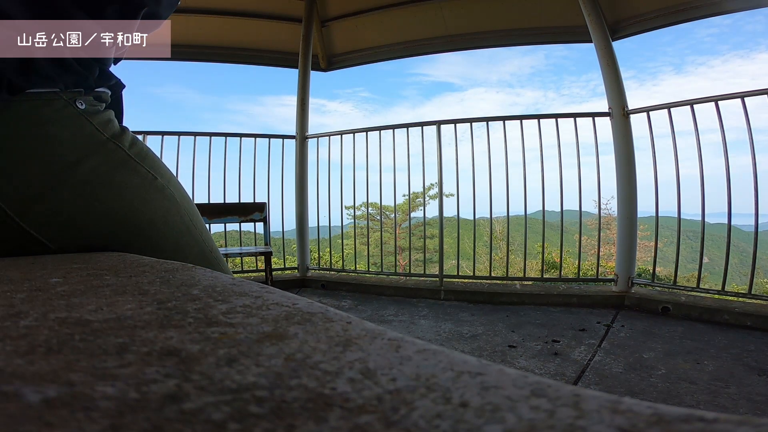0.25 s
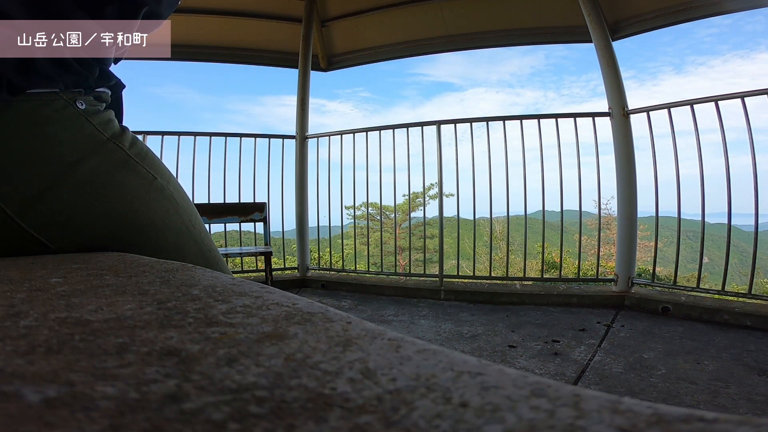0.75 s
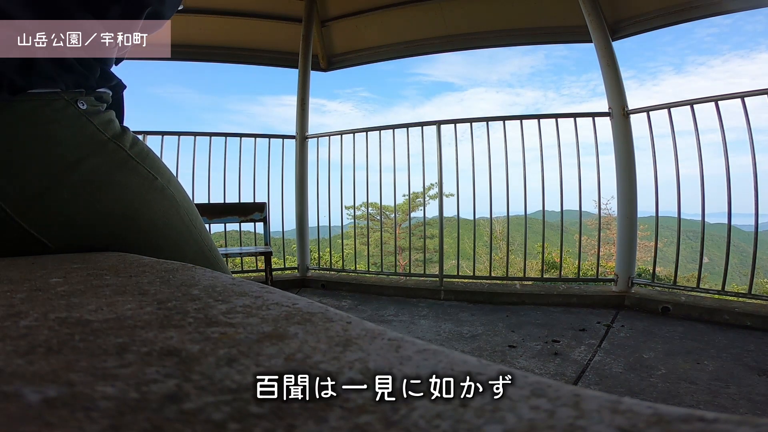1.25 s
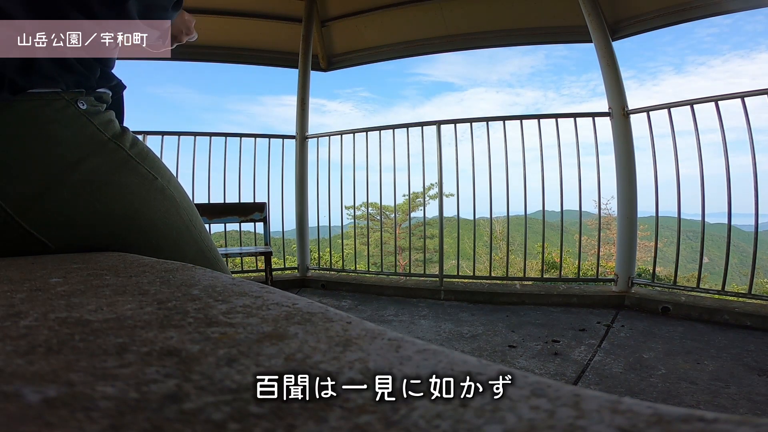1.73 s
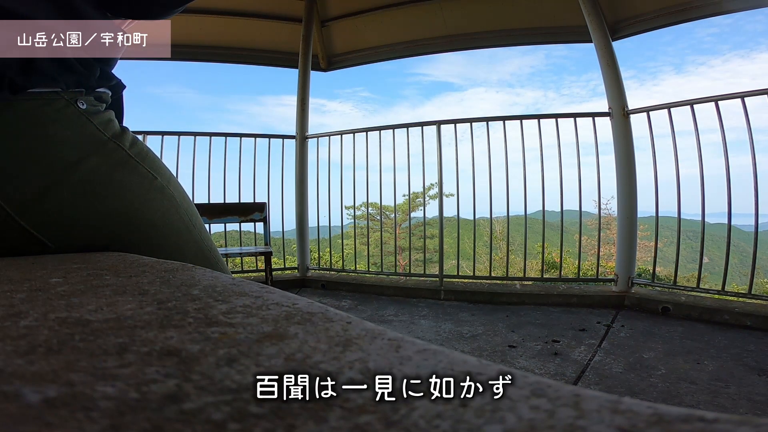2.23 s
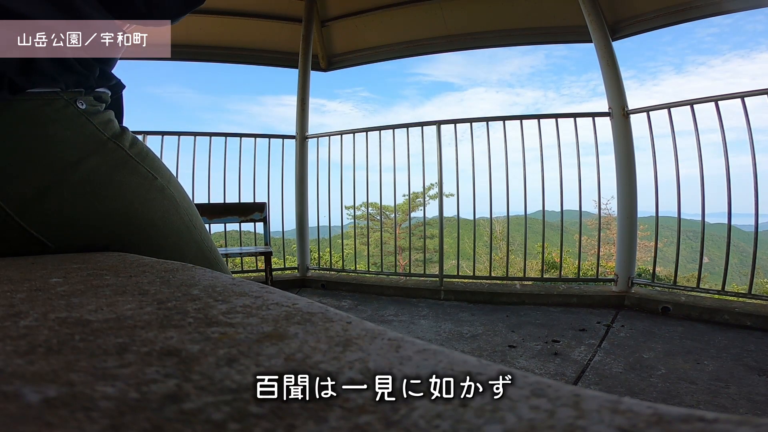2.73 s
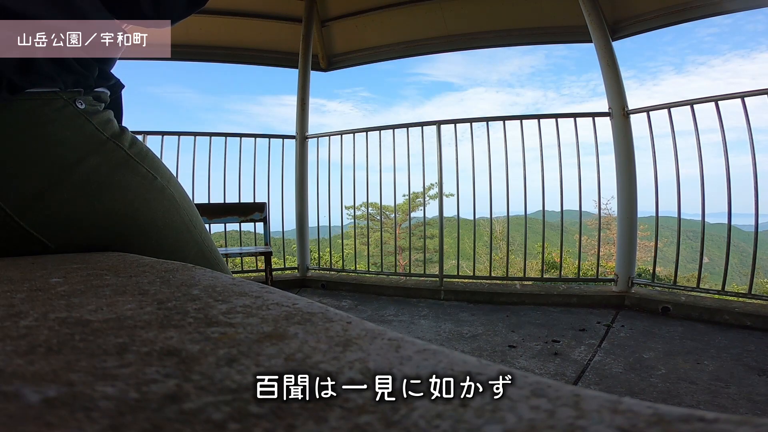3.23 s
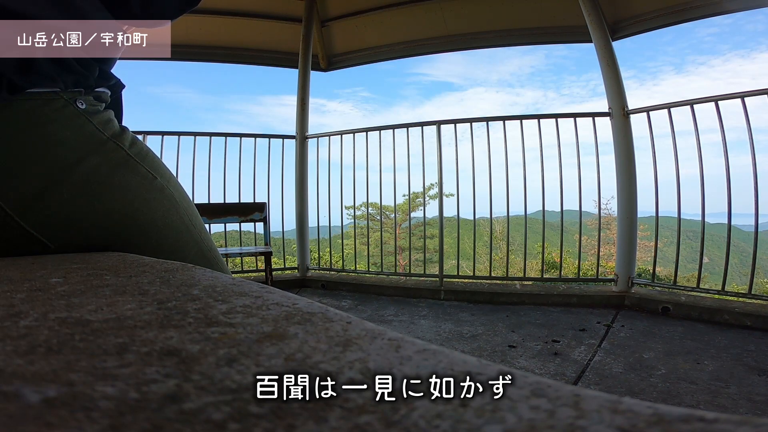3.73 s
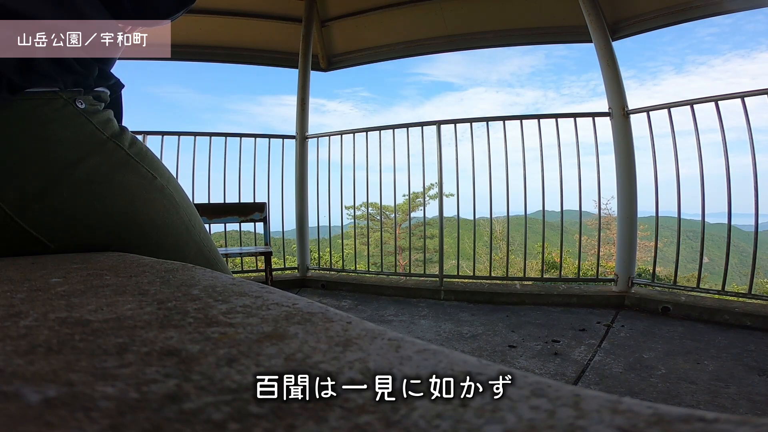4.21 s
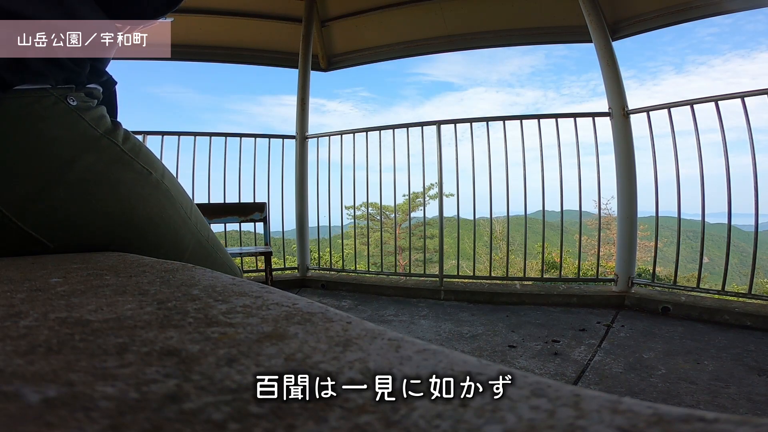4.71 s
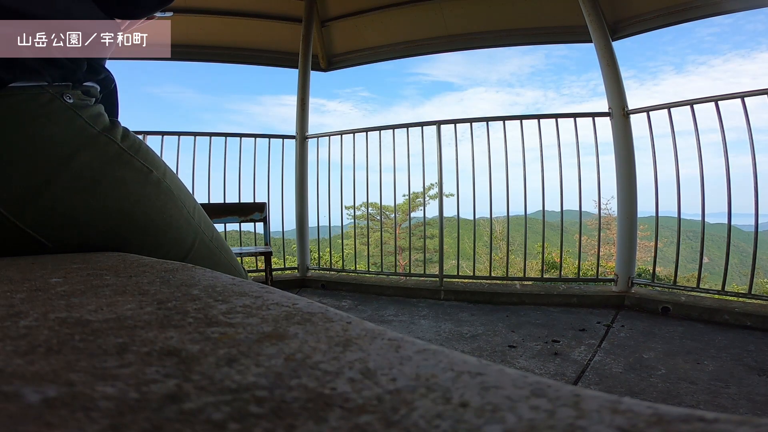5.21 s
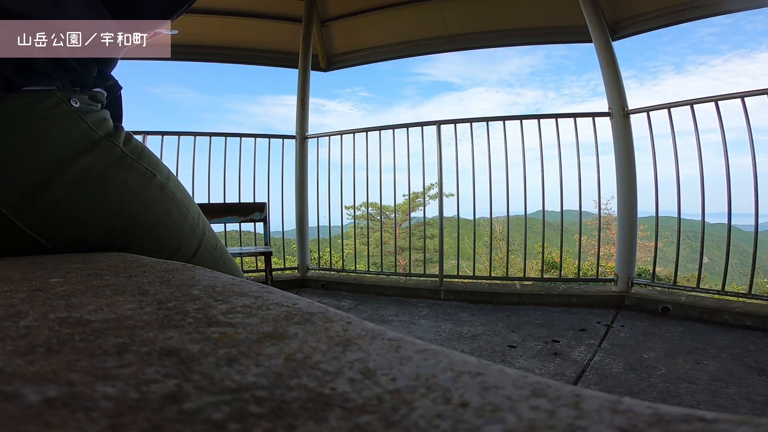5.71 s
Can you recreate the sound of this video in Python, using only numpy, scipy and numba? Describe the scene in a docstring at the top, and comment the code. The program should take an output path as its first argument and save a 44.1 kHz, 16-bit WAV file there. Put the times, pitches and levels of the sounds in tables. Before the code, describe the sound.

A steady, very high whine of many cicadas surrounds an open hilltop shelter throughout and is the loudest sound. Underneath, a muffled one-cylinder engine thumps unevenly at idle, light air rumbles on the microphone, and leaves rustle faintly. Someone shifts with a soft knock just after the start. A bird, slightly to the left, whistles a raspy phrase of quick rising and falling notes from about 0.2 to 1.1 seconds, and a second from 1.5 to 2.1 seconds, each with a short echo. The engine grows a little louder from about 1.5 seconds, running fastest near 3 seconds. All the while, one nearer buzzing cicada slides slowly down in pitch; at 4.5 seconds it falters briefly and jumps up to a higher note as the engine eases back. A few soft, dull knocks come around 5.3 to 5.5 seconds, and the cicadas carry on to the end, near 6 seconds.

```python
"""A hilltop shelter in summer. From the start, cicadas click their drum-like plates into a whine, a
one-cylinder engine thumps unevenly at idle, and light air rumbles and rustles the leaves. Someone shifts
with a soft knock, then a bird whistles two phrases of gliding notes; in the second, the engine grows
louder. All this time one near cicada slides down in pitch. At 4.5 seconds it jumps up and the engine
eases back. A few more soft knocks come near the end."""
import sys
import numpy as np
from scipy import signal
from scipy.fft import rfft, irfft, next_fast_len
from scipy.io import wavfile
from scipy.ndimage import uniform_filter1d
from numba import njit

SR = 44100
rng = np.random.default_rng(int(sys.argv[2]) if len(sys.argv) > 2 else 0)


def dump_mix(stems):
    """Bounce the given channels to the path in sys.argv[1] as a 16-bit WAV at rate SR."""
    frames = np.atleast_2d(stems).T  # one column per channel
    limited = np.clip(frames, -1, 1)  # hard clip at full scale
    pcm = np.round(limited * 32767).astype(np.int16)
    wavfile.write(sys.argv[1], SR, pcm)


N = 262822
TIME = np.arange(N) / SR


def undb(db):
    """Turn decibels into a number to multiply by."""
    return 10 ** (np.asarray(db) / 20)


def unit(x):
    """Scale a signal so its average strength (rms) is one."""
    return x / np.sqrt(np.mean(x ** 2))


def curve(rows):
    """Join (seconds, value) points with straight lines."""
    return np.interp(TIME, *np.transpose(rows))


def onset(start_s, rise_s):
    """Zero until the start, then settling at one."""
    return 1 - np.exp(-np.maximum(TIME - start_s, 0) / rise_s)


def wander(rate):
    """A smooth random wobble of size one, taking about `rate` new values a second."""
    hold = max(int(SR / rate), 2)
    steps = np.repeat(rng.standard_normal(N // hold + 1), hold)
    return unit(uniform_filter1d(uniform_filter1d(steps, hold), hold)[:N])


def colour(x, points):
    """Make some pitches louder and others softer, following (Hz, dB) points."""
    hz, db = np.transpose(points)
    size = next_fast_len(N, True)
    bin_hz = np.maximum(np.fft.rfftfreq(size, 1 / SR), 1)
    gain = undb(np.interp(np.log(bin_hz), np.log(hz), db))
    return irfft(rfft(x, size) * gain, size)[..., :N]


@njit
def moving_bandpass(x, tuning, damping):
    """A filter that lets through one band of pitches, which may move."""
    out, band_state, low_state = np.empty(len(x)), 0., 0.
    for i in range(len(x)):
        band = (band_state + tuning[i] * (x[i] - low_state)) / (1 + tuning[i] * (tuning[i] + damping[i]))
        band_state = 2 * band - band_state
        low_state += 2 * tuning[i] * band
        out[i] = damping[i] * band
    return out


def resonate(x, hz, width_hz, passes=1):
    """Keep the sound near one pitch; each extra pass cuts the rest more sharply."""
    hz = hz * np.ones(N)
    for _ in range(passes):
        x = moving_bandpass(x, np.tan(np.pi * hz / SR), width_hz / hz)
    return x


def diffuse(likeness):
    """Noise from all round at two close microphones; a likeness of 1 makes both sides the same."""
    mid, side = rng.standard_normal((2, N))
    return (np.sqrt(1 + likeness) * mid + np.sqrt(1 - likeness) * side * np.array([[1], [-1]])) / np.sqrt(2)


def pan(left_db):
    """Left and right gains that put the left side `left_db` above the right."""
    return undb(np.array([[left_db], [-left_db]]) / 2)


def scatter(x, fade_s):
    """Countless echoes from trunks, leaves and roof, different on each side but favouring no pitch."""
    echoes = rng.standard_normal((2, 2 * SR)) * undb(-60 * TIME[:2 * SR] / fade_s)
    even_echoes = irfft(np.exp(1j * np.angle(rfft(echoes))))[:, :SR]
    return signal.fftconvolve(x[None], even_echoes, axes=1)[:, :N]


# The tone of a wood full of cicadas. Each row: frequency in Hz, relative level in dB.
CHORUS_TONE = [(3800, -33.5), (4400, -26.5), (5200, -19.5), (6000, -11.5), (6800, -7.5), (7500, -4),
               (8300, 0), (8900, -4), (9500, -8.5), (10100, -15), (10900, -26), (12800, -26.5),
               (14500, -32), (15700, -35)]
# Far cicadas that hold their note. Each row: pitch in Hz, width of the band in Hz, level in dB.
FAR_CICADAS = [(7460, 80, -59), (8130, 90, -53.5), (8840, 145, -47.5)]


def cicada_chorus(level_db=-34.5, flicker_db=.5, shimmer_db=3.0):
    """Many cicadas merge into one whine; a few stand out, each wavering on its own note."""
    whine = unit(colour(diffuse(likeness=-0.18), CHORUS_TONE)) * undb(level_db + flicker_db * wander(40))
    for hz, width_hz, db in FAR_CICADAS:
        wavering_hz = hz * (1 + 0.0033 * wander(3.09))
        voice = np.array([resonate(side, wavering_hz, width_hz, passes=2) for side in diffuse(-0.24)])
        whine += unit(voice) * undb(db + shimmer_db * wander(5.5))
    return whine * pan(left_db=-1.0)


# The beat of the near cicada's tymbal, its ribbed drum plate. Each row: time in seconds, clicks a second.
CLICK_RATE = [(0, 499), (1.5, 486), (2.9, 502), (4.45, 512), (4.8, 487), (5.96, 486)]


def near_cicada(first_hz=7120, lowest_hz=5578, highest_hz=7790, sink_s=1.75, leap_s=4.52, rasp=1.46):
    """Clicks ring the hollow belly, whose note sinks as it stretches and leaps when it lets go."""
    sinking_hz = lowest_hz + (first_hz - lowest_hz) * np.exp(-TIME / sink_s)
    belly_hz = sinking_hz + (highest_hz - sinking_hz) * onset(leap_s, rise_s=.22)
    # The voice swells at first, and falters briefly at the leap.
    falter = onset(leap_s, rise_s=0.021) - onset(leap_s, rise_s=0.22)
    level_db = -41.5 - 5 * np.exp(-TIME) - 5.5 * falter
    click_hz = curve(CLICK_RATE) * (1 + .009 * wander(170) + .002 * wander(12))
    beats = np.cumsum(click_hz) / SR
    clicks = unit(sum(np.cos(2 * np.pi * harmonic * beats) for harmonic in range(10, 21)))
    ribs = unit(rng.standard_normal(N) * np.exp(-(beats % 1) / 0.32))  # the ribs buckle unevenly
    buzz = colour(clicks + rasp * ribs, [(4600, -29), (5050, 1.5), (5400, 0.5), (10000, -0.5)])
    belly = resonate(buzz, belly_hz, width_hz=760, passes=2)
    plate = resonate(buzz, hz=6600, width_hz=1100, passes=2)  # the tymbal's own ring
    song = unit(scatter(belly, fade_s=0.15)) + undb(-4.5) * unit(scatter(plate, fade_s=0.2))
    return song * undb(level_db) * pan(left_db=-1.5)


def thump(cycles, hz, fade_s, rise_s, sizes_db):
    """One note of a pipe, rung by a soft puff each time the cycle count passes a whole number."""
    starts = np.flatnonzero(np.diff(np.floor(cycles), prepend=-1))
    puffs, age = np.zeros(N), TIME[:SR // 2]
    puffs[starts] = undb(sizes_db[:len(starts)])
    ring = np.sin(2 * np.pi * hz * age) * undb(-60 * age / fade_s) * (1 - np.exp(-age / rise_s))
    return signal.fftconvolve(puffs, ring)[:N]


# The engine's uneven speed. Each row: time in seconds, firings a second.
IDLE_SPEED = [(0.0, 12.82), (0.35, 11.51), (0.7, 12.67), (0.9, 10.96), (1.35, 10.05), (1.7, 13.09),
              (2.3, 13.52), (2.95, 16.01), (3.15, 12.83), (3.55, 13.44), (3.8, 10.44), (3.95, 11.65),
              (4.7, 12.11), (5.05, 11.33), (5.96, 12.41)]
# The throttle opens a little, then eases back.
# Each row: start in seconds, settling time in seconds, change in dB.
THROTTLE_MOVES = [(1.55, 0.38, 5), (4.55, .3, -2.5)]
# Weak firings, and the hard ones that burn their spare fuel. Each row: time in seconds, change in dB.
ODD_FIRINGS = [(1.39, -2.5), (3.14, -2), (3.77, -1.5), (3.86, 2), (5.14, 1), (5.23, 1.5), (5.31, 2.5)]
# The notes the silencer rings at. Each row: pitch in Hz, seconds to fade by 60 dB, relative level in dB.
SILENCER_NOTES = [(45, 0.31, -27.5), (75, 0.11, -12), (103.6, 0.22, -16), (114.9, 0.04, 3.5),
                  (170.6, 0.097, -19.5), (208.3, 0.12, -23)]


def engine(rest_rate=12, uneven_db=1.05, muffle_hz=240):
    """Each firing thumps the silencer, the intake gulps in between, and the valves rattle the casing."""
    rate = curve(IDLE_SPEED)
    cycles = np.cumsum(rate) / SR
    # Firings hit harder with more speed and more throttle.
    throttle_db = sum(db * onset(start, settle_s) for start, settle_s, db in THROTTLE_MOVES)
    force_db = -49.5 + 0.77 * (rate - rest_rate) + throttle_db
    # As the engine warms, the intake gulps harder and the valves quieten.
    intake_db = -56 + 1.5 * TIME
    valves_db = -66 - 1.6 * TIME + 1.56 * (rate - rest_rate)
    chances = rng.standard_normal((int(cycles[-1]) + 3, len(SILENCER_NOTES) + 2))  # a row per firing
    firing_chance, gulp_chance, *note_chances = chances.T
    firing_db = uneven_db * firing_chance
    for when, change_db in ODD_FIRINGS:
        firing_db[round(np.interp(when, TIME, cycles)) - 1] += change_db
    thumps = sum(thump(cycles, hz, fade_s, rise_s=0.013, sizes_db=db + firing_db + 2 * chance)
                 for (hz, fade_s, db), chance in zip(SILENCER_NOTES, note_chances))
    churn = resonate(rng.standard_normal(N), hz=142, width_hz=108)
    exhaust = (unit(thumps) + undb(-15) * unit(churn)) * undb(force_db)
    gulp_cycles = cycles - .5 + 0.141 * wander(11)
    intake = thump(gulp_cycles, hz=42.3, fade_s=0.1, rise_s=0.033, sizes_db=4.7 * gulp_chance)
    casing = resonate(rng.standard_normal(N) * np.exp(-(cycles % 1) / .3), hz=203.5, width_hz=48)
    throb = exhaust + unit(intake) * undb(intake_db) + unit(casing) * undb(valves_db + 10)
    muffled = signal.sosfilt(signal.butter(5, muffle_hz, fs=SR, output="sos"), throb)
    taps = diffuse(likeness=0.12) * np.exp(-(cycles % 1))
    clatter = np.array([resonate(side, hz=687, width_hz=108) for side in taps])
    return muffled + unit(clatter) * undb(valves_db)


# The tone of air hitting the microphones. Each row: frequency in Hz, relative level in dB.
BREEZE_TONE = [(8, -39), (24, -3), (38, 2.5), (80, -10), (160, -16), (400, -44), (2000, -88)]


def breeze(level_db=-59, gust_db=6.0):
    """Light air buffets both microphones alike with a deep rumble."""
    rumble = colour(rng.standard_normal(N), BREEZE_TONE)
    return unit(rumble) * undb(level_db + gust_db * wander(23))


# The tone of leaves and distant air. Each row: frequency in Hz, relative level in dB.
LEAVES_TONE = [(20, 8.5), (60, 10), (150, 13.5), (300, 4.5), (480, -6), (720, 0.5), (1100, 0), (1800, 4),
               (2700, 3), (3600, -0.5), (5000, 2.5), (15000, -39)]
# How their loudness rises and falls. Each row: time in seconds, level in dB.
LEAVES_LEVEL = [(0, -56.5), (.8, -56.5), (1.3, -59.5), (1.9, -53.5), (2.6, -58), (5.96, -60)]


def leaves(flutter_db=1.15):
    """Leaves and distant air blend into a faint, fluttering wash."""
    wash = unit(colour(diffuse(likeness=0.32), LEAVES_TONE))
    return wash * undb(curve(LEAVES_LEVEL) + flutter_db * wander(25.08)) * pan(left_db=-1)


# Soft knocks. Each row: start in seconds, pitch in Hz, seconds to fade by 60 dB, starting level in dB.
BUMPS = [(.131, 477, 0.038, -50.5), (5.335, 480, 0.065, -58.5), (5.356, 773, 0.034, -49),
         (5.358, 1600, 0.019, -48), (5.472, 430, 0.037, -57)]


def knocks(width_share=0.8, rise_s=0.0015):
    """Shoes and clothing bump the floor and bench, making short dull bursts."""
    out = np.zeros(N)
    for start, hz, fade_s, db in BUMPS:
        age = np.maximum(TIME - start, 0)
        burst = unit(resonate(rng.standard_normal(N), hz, width_share * hz, passes=2))
        out += burst * undb(db - 60 * age / fade_s) * np.minimum(age / rise_s, 1)
    return out


# The bird's notes. Each row: start in seconds, length in seconds, first pitch in Hz, last pitch in Hz,
# bend (above zero the pitch moves late, below zero early), relative level in dB, swell in dB.
BIRD_NOTES = [ (0.237, 0.027, 1560, 2650, .5, -49, -8), (.329, 0.03, 1470, 2770, .5, -47, -3),
              (.420, 0.085, 1540, 3074, 1.74, -44, 1), (0.57, .17, 3580, 3780, -0.7, -45, -6),
              (0.749, 0.18, 3460, 1483, -6.5, -46.5, 0), (.928, 0.19, 1630, 3070, 12, -41, -4),
              (1.462, 0.028, 1553, 2780, 0.9, -47.5, -11), (1.555, 0.05, 1547, 2135, -1.5, -47.5, 1),
              (1.589, 0.044, 2116, 1575, -0.2, -49, 2), (1.627, .090, 1513, 3210, 2.1, -44, 2),
              (1.778, 0.241, 3800, 3690, -7.5, -48, -5), (2.010, .052, 3480, 1726, -0.5, -45.5, 4),
              (2.053, .048, 1747, 2876, -1.5, -45, -1)]
# Its throat favours the middle of its range. Each row: pitch in Hz, change in dB.
THROAT_TONE = [(1450, -6.5), (1630, -4.5), (1950, -1.5), (2850, -2), (3700, -10.5)]
# Echoes from the roof, then the trees.
# Each row: fade time in seconds, relative level in dB, left minus right in dB.
BIRD_ECHOES = [(.2, 1, -2), (.65, -6.5, -1.5)]


def bird(gain_db=-3, hoarse_hz=3450, flutter_hz=271, flutter_depth=0.26, rise_s=0.0073, fall_s=0.0027):
    """Raspy gliding whistles, reedy when low and hoarse when high, smeared by roof and trees."""
    song, tremble = np.zeros(N), wander(700)
    for start, length, from_hz, to_hz, bend, db, swell_db in BIRD_NOTES:
        playing = (TIME >= start) & (TIME < start + length)
        age = TIME[playing] - start
        hz = from_hz + (to_hz - from_hz) * np.expm1(bend * age / length) / np.expm1(bend)
        fade = np.minimum(np.minimum(age / rise_s, (length - age) / fall_s), 1)
        throat_db = np.interp(hz, *np.transpose(THROAT_TONE))
        loudness = fade * undb(db + swell_db * (age / length - .5) + throat_db)
        hoarseness = .011 + .012 * np.clip((hz - hoarse_hz) / 100, 0, 1)
        # A fast flutter of the voice box shakes loudness and pitch together.
        flutter = flutter_depth * np.cos(2 * np.pi * flutter_hz * age)
        shaken_hz = hz * (1 + hoarseness * tremble[playing]) + flutter_hz * flutter / 2
        phase = 2 * np.pi * np.cumsum(shaken_hz) / SR
        octave_db = -5.5 - np.clip(.04 * (hz - 1650), 0, 12)  # the throat damps it as the note climbs
        whistle = np.sin(phase) + undb(octave_db) * np.sin(2 * phase)
        song[playing] += np.sqrt(2) * loudness * (1 + flutter) * whistle
    song *= 1 + .22 * wander(2200)  # the rasp
    direct = undb(-1) * song * pan(left_db=-9)
    echoes = sum(undb(db) * scatter(song, fade_s) * pan(left_db) for fade_s, db, left_db in BIRD_ECHOES)
    return undb(gain_db) * (direct + echoes)


def scene():
    """Everything around the shelter, added together."""
    return cicada_chorus() + near_cicada() + engine() + breeze() + leaves() + knocks() + bird()


def record(dry):
    """The microphones lose the deepest bass (below 15 Hz) and the highest treble (above 15500 Hz)."""
    lean = signal.sosfilt(signal.butter(1, 15, "high", fs=SR, output="sos"), dry)
    return signal.sosfilt(signal.ellip(10, .1, 80, 15500, fs=SR, output="sos"), lean)


dry = scene()
out = record(dry)
dump_mix(out)
```